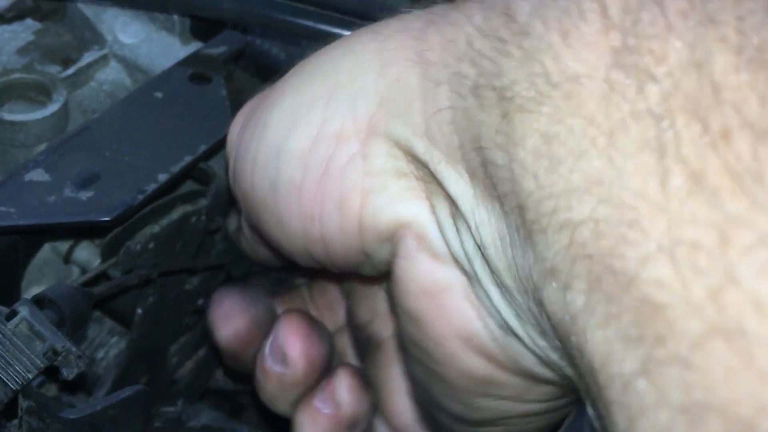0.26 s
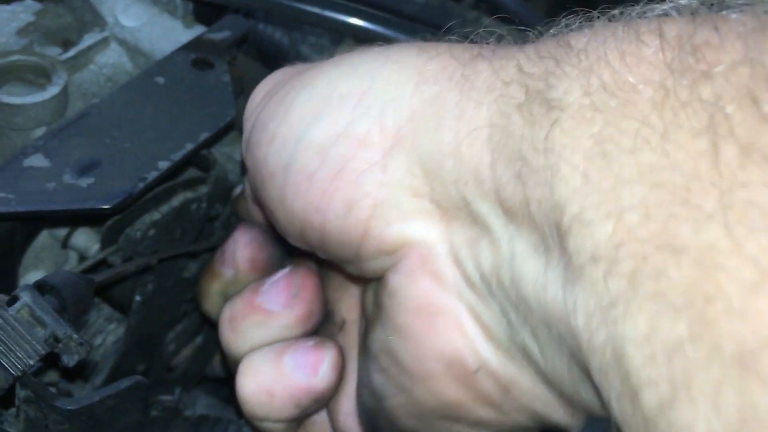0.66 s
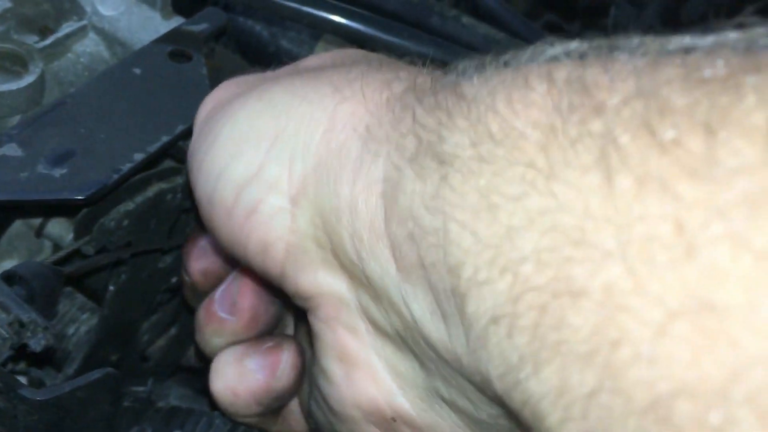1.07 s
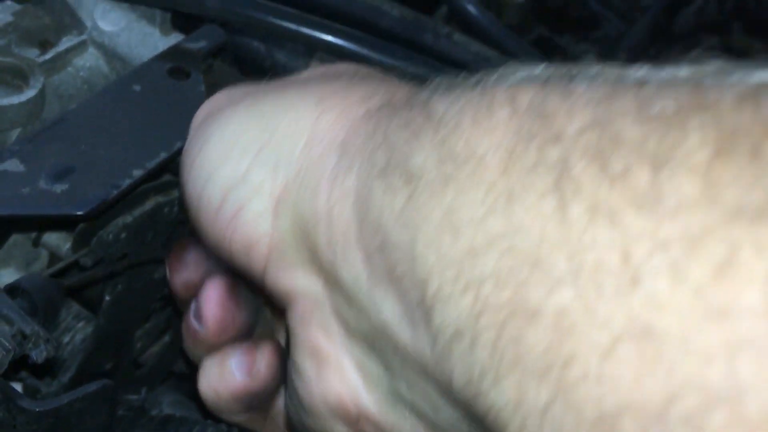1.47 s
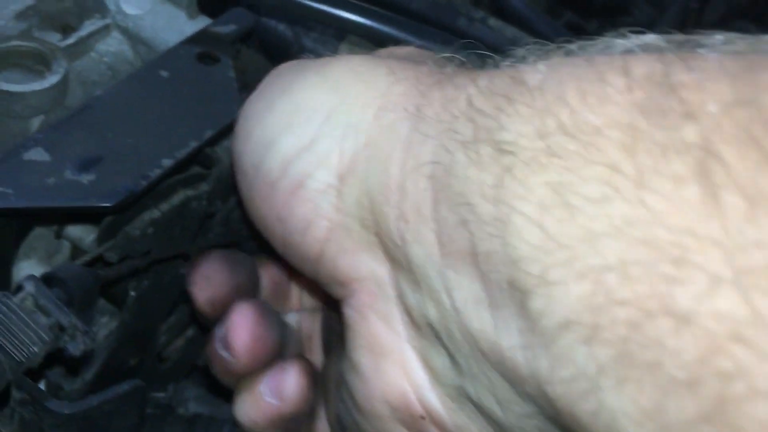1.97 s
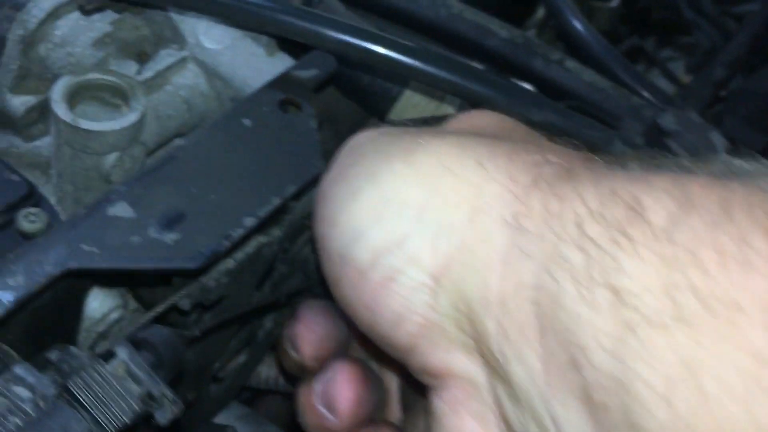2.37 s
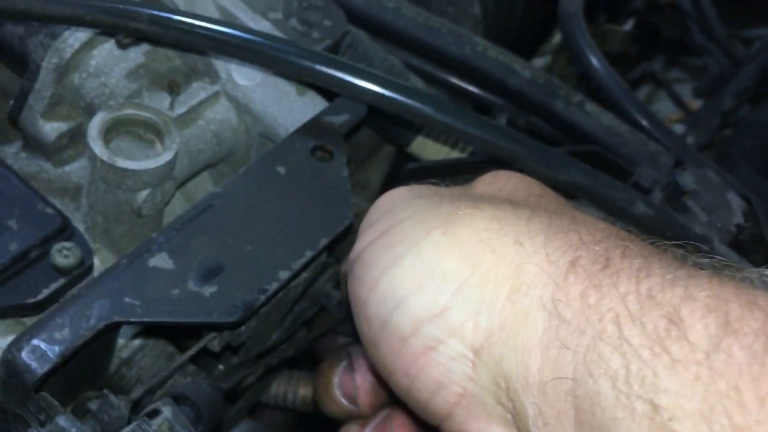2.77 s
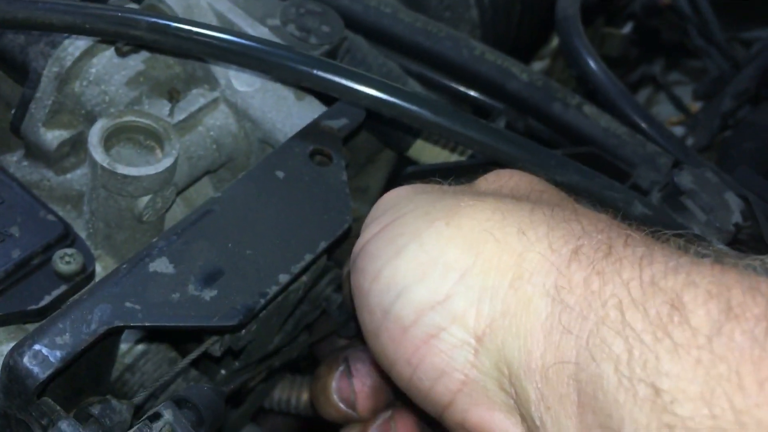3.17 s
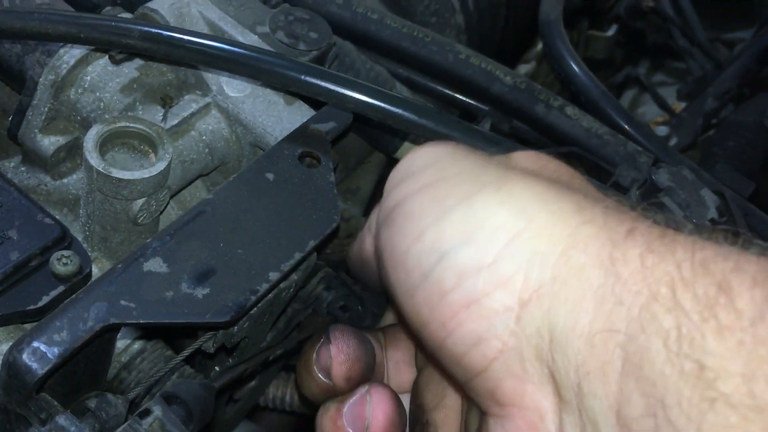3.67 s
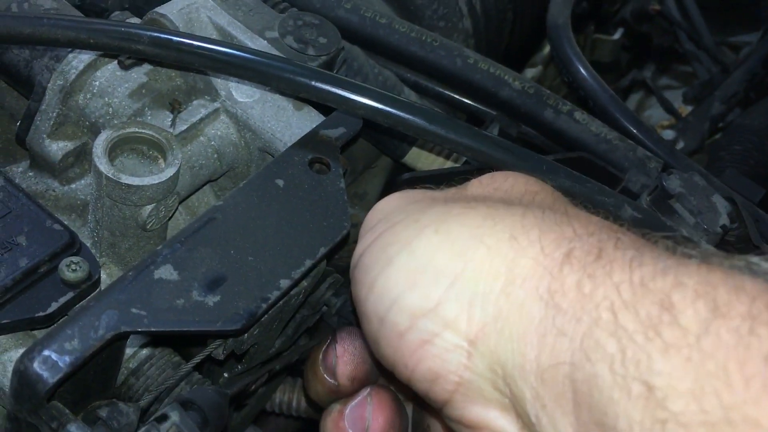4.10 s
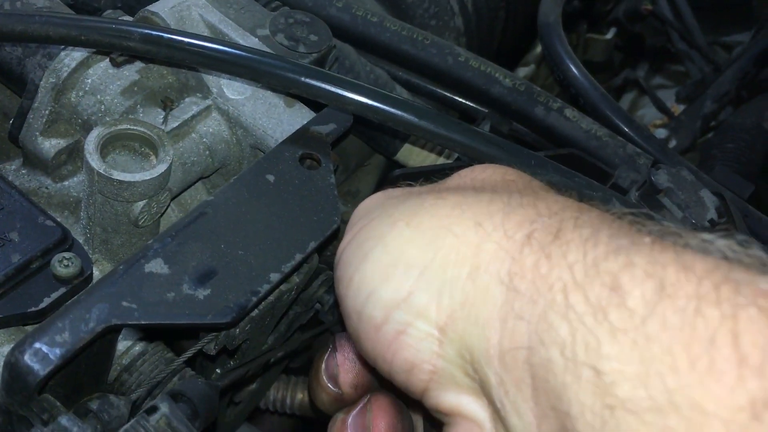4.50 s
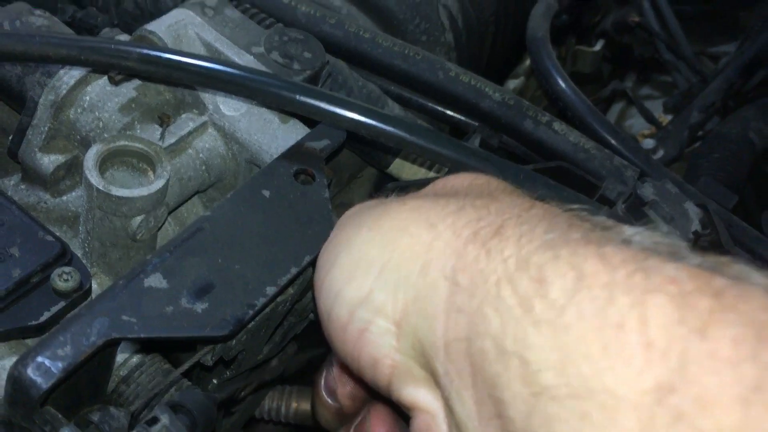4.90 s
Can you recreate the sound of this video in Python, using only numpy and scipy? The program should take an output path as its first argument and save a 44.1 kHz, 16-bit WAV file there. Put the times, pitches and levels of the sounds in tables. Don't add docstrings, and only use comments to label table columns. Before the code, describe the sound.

Fingers tick and scuff on hollow plastic in a quiet garage, then one loud bright snap cracks, followed by sparse faint handling ticks.

```python
import sys
import numpy as np
from scipy import signal
from scipy.fft import rfft, irfft
from scipy.io import wavfile

SR = 44100
rng = np.random.default_rng(int(sys.argv[2]) if len(sys.argv) > 2 else 0)


def master(y):
    cut = np.clip(np.atleast_2d(y).T, -1, 1)
    pcm = np.round(cut * 32767)
    wavfile.write(sys.argv[1], SR, pcm.astype(np.int16))


def convert_level_to_amplitude(level_db):
    exponent = np.asarray(level_db, float) / 20
    return 10 ** exponent


N = 226933
STEADY_HZ = 15800


def evened(x):
    return x / np.sqrt(np.mean(x ** 2) + 1e-20)


def read(points, hz):
    f, value = np.transpose(points)
    return np.interp(np.log(hz + 1), np.log(f + 1), value)


def automation(points):
    return np.interp(np.arange(N) / SR, *np.transpose(points))


def add(mix, s, sound):
    part = mix[round(s * SR):][:len(sound)]
    part += sound[:len(part)]


def coloured(x, spectrum):
    gain = convert_level_to_amplitude(read(spectrum, np.fft.rfftfreq(len(x), 1 / SR)))
    return evened(irfft(rfft(x) * gain, len(x)))


def below(x, hz):
    taps = signal.firwin(511, hz, window=("kaiser", 9), fs=SR)
    return signal.oaconvolve(x, taps, "same")


def resonate(x, hz, width):
    r = np.exp(-np.pi * width / SR)
    pole = r * np.exp(2j * np.pi * hz / SR)
    return 2 * signal.lfilter([1 - r], [1, -pole], x).real


def narrow_band(drive, hz, width):
    return evened(resonate(resonate(drive, hz, width), hz, width))


def ring(hz, t60, s=.25):
    t = np.arange(round(s * SR)) / SR
    return convert_level_to_amplitude(-60 * t / max(t60, .002)) * np.sin(2 * np.pi * hz * t)


def eased_in(tone, rise_s):
    return tone * np.minimum(np.arange(len(tone)) / (rise_s * SR), 1)


def chord(modes, spread_db):
    out = 0
    for hz, db, t60 in modes:
        level = convert_level_to_amplitude(db + spread_db * rng.standard_normal())
        out = out + level * ring(hz * rng.normal(1, 0.0072), t60)
    return out


def gritty(size, grit_db):
    grains = np.repeat(rng.exponential(1, size // 32 + 1), 32)[:size]
    return evened(rng.standard_normal(size) * convert_level_to_amplitude(grit_db * np.minimum(grains, 4)))


# f/Hz, level/dB per Hz
HISS = [(88, -31), (150, -10), (430, -15), (502, -13.5), (741, -19.5), (1010, -19), (1360, -24),
        (2340, -24.5), (4910, -27.5), (8980, -29.5), (15800, -34.5)]
# t/s, level/dB
OPEN = [
    (1.758, 2),
    (1.765, 8.5),
    (2.167, 12.5),
    (2.18, 0.5),
]


def hiss():
    noise = coloured(rng.standard_normal(N), [(60, -39.0)] + HISS)
    return convert_level_to_amplitude(-72.5 + automation(OPEN)) * noise


# f/Hz, level/dB per Hz
HUM = [(12, -61), (20, -34), (30, -20), (51, 1), (70, 4), (116, -1), (125, -5.5), (134, -17.5), (150, -8),
       (168, -16), (221, -15.5), (265, -23), (300, -21), (390, -55), (660, -120)]
# t/s, level/dB
HUM_SWELL = [(0.0, -56), (0.31, -60.5), (0.7, -58), (1.6, -60.5), (2.55, -59.5), (2.94, -58),
             (4.669, -57.5), (5.15, -59)]


def hum():
    motor_hz, motor_width_hz, motor_db = 107, 4.2, -7
    motor = resonate(rng.standard_normal(N), motor_hz, motor_width_hz)
    rumble = coloured(rng.standard_normal(N), HUM)
    return convert_level_to_amplitude(automation(HUM_SWELL)) * (rumble + convert_level_to_amplitude(motor_db) * coloured(motor, HUM))


# f/Hz, t60/s
GARAGE = [(200, 0.94), (600, 0.2996), (2000, 0.51), (5000, 0.48), (9000, 0.45), (15000, 0.28)]


def garage(x):
    hz, t, z = signal.stft(rng.standard_normal(SR), SR, nperseg=256)
    tail = signal.istft(z * convert_level_to_amplitude(-60 * t / read(GARAGE, hz)[:, None]), SR, nperseg=256)[1]
    tail *= np.clip((np.arange(len(tail)) / SR - .004) / 0.0024, 0, 1)
    return signal.fftconvolve(x, tail / np.linalg.norm(tail))[:N]


# f/Hz, width/Hz, level/dB
HOUSING = [(620, 44, -5), (1191, 330, -7.5), (1660, 60, -4), (1860, 14, 0), (2230, 140, -8.5)]
# f/Hz, level/dB per Hz
BODY = [(300, -23), (600, 4.5), (1200, 1), (2400, -4.5), (3500, -12), (6000, -38)]


def rubbed_body(drive, housing_share):
    housing = sum(convert_level_to_amplitude(db) * resonate(drive, hz, width) for hz, width, db in HOUSING)
    return evened(coloured(drive, BODY) + housing_share * evened(housing))


# f/Hz, level/dB per Hz
RUSTLE = [(100, -26.5), (170, 2.5), (350, 3), (600, -35.5)]
FIZZ = [(1500, -27), (3200, -3), (6000, 5), (9500, -0.5), (13000, -3), (15600, -12), (16100, -59.5)]
# t/s, level/dB
SLIDE = [(0.0, 10), (0.1, 1), (0.27, -8), (0.64, 6), (0.8, 7.5), (1.07, 0.5), (1.3, 8), (1.5, -11),
         (1.75, 8.5), (2.0, 5.5), (2.2, -8), (2.49, 6.5), (2.65, 1.5), (3.15, -12), (4.08, -6), (4.6, -12),
         (4.9, -3), (5.15, 2.5)]
# level/dB at middle effort, rise/dB per dB of effort
SLIDE_LAYERS = [
    (-65.5, 0.93),
    (-64.5, 0.89),
    (-79.5, 1.2),
]


def slide():
    drive = gritty(size=N, grit_db=1.0)
    effort_db = automation(SLIDE)
    layers = coloured(drive, RUSTLE), rubbed_body(drive, 0.18), coloured(drive, FIZZ)
    out = np.zeros(N)
    for (db, share), layer in zip(SLIDE_LAYERS, layers):
        out += convert_level_to_amplitude(db + share * effort_db - 10.5) * layer
    return out


# t/s, length/s, level/dB, f/Hz, width/Hz
DRAGS = [(.02, 0.1, -64, 610, 200), (0.808, 0.71, -68, 317.6, 59.4), (3.785, 0.082, -81, 674, 180),
         (4.97, 0.065, -68.5, 670, 120.4), (3.785, 0.085, -82, 1830, 120), (4.01, 0.16, -79, 1830, 400),
         (2.3, .38, -72, 1020, 600), (2.38, .1, -79, 1830, 250), (2.5, .1, -83, 3100, 130),
         (2.5, .15, -82, 2130, 250), (.89, .16, -69, 1050, 400), (.9, .12, -76, 2420, 150),
         (1.115, .1, -75, 2150, 400), (1.115, .12, -71, 1200, 600), (1.24, .08, -72, 1000, 500),
         (3.58, .08, -79, 1750, 150), (1.41, .04, -73, 1900, 150)]


def drags():
    out = np.zeros(N)
    for s, length, db, hz, width in DRAGS:
        band = narrow_band(gritty(size=32768, grit_db=2.5), hz, width)
        count = round(length * SR)
        add(out, s, convert_level_to_amplitude(db) * band[:count] * signal.windows.tukey(count, .7))
    return out


# t/s, length/s, level/dB, f/Hz, width/Hz
SINGING = [(.04, .045, -62, 8450, 250), (.045, .035, -64, 9500, 300), (.022, .02, -67, 6500, 500),
           (.075, .026, -62, 2500, 900), (.1, .025, -70, 12800, 500), (.115, .02, -70, 7000, 600),
           (.34, .05, -67, 8500, 400), (.35, .035, -70, 9900, 300), (.828, .016, -62, 5600, 300),
           (.824, .016, -65, 7400, 350), (.825, .02, -66, 9500, 400), (.826, .03, -67, 10800, 300),
           (.826, .012, -63, 3300, 400), (.838, .025, -66, 3900, 250), (.84, .022, -67, 5500, 350),
           (.855, .018, -66, 1800, 200), (3.79, .08, -73, 1850, 25), (4.06, .04, -73, 1830, 60),
           (4.03, .1, -77, 1660, 60), (4.11, .05, -77, 1830, 60), (3.921, .012, -66, 2350, 200),
           (3.778, .014, -68, 2500, 200), (2.265, .035, -72, 1100, 150), (2.31, .05, -74, 1350, 200),
           (2.31, .07, -74, 930, 150), (2.53, .03, -72, 1050, 300), (2.585, .1, -73, 1150, 200),
           (2.55, .07, -81, 3500, 200), (2.41, .03, -75, 2100, 200), (2.52, .135, -77, 3080, 50),
           (2.255, .03, -75, 2050, 300), (2.45, .05, -76, 1800, 120), (4.76, .05, -77, 1800, 60),
           (5.04, .04, -75, 1840, 100), (.79, .04, -62, 150, 40), (1.41, .05, -64, 140, 40),
           (1.77, .022, -40, 8600, 700), (5.0, .07, -73, 3570, 80), (5.055, .04, -73, 3280, 150),
           (4.968, .02, -70, 1730, 200)]


def singing():
    out = np.zeros(N)
    for s, length, db, hz, width in SINGING:
        band = narrow_band(gritty(size=8192, grit_db=3.0), hz, width)
        settled = band[2048:]
        count = round(length * SR)
        add(out, s, convert_level_to_amplitude(db) * settled[:count] * signal.windows.tukey(count, .6))
    return out


def stroke_shape(count):
    u = np.linspace(0, 1, count)
    return np.sqrt(np.clip(u / 0.14, 0, 1) * np.clip((1 - u) / .5, 0, 1))


# t/s, length/s, level/dB, fizz against body/dB
SCUFFS = [(.0, .13, -67.5, 1.5), (.022, 0.062, -65.5, -17), (0.085, 0.01, -58, -10),
          (0.144, .022, -66, -28), (0.183, 0.031, -69.5, -5), (0.278, 0.032, -70.5, -3),
          (0.313, 0.038, -60, -6), (0.345, 0.042, -73, 0), (0.421, 0.061, -69.5, -12),
          (0.664, 0.016, -63, -14), (0.683, 0.037, -57.5, -4), (0.82, 0.043, -63, 2),
          (0.879, 0.17, -63, -10.5), (1.233, 0.067, -67.5, -17), (1.391, 0.092, -67, -8),
          (1.669, 0.15, -68, -5), (1.713, .014, -70, 5), (1.807, 0.054, -61, -15), (2.562, 0.11, -77, 2),
          (2.9, 0.19, -74, -18), (3.392, 0.012, -61, -7), (3.406, 0.085, -77, -8), (3.776, 0.018, -66, 6),
          (3.897, 0.042, -74, 2.5), (4.018, 0.13, -73, -2.5), (4.749, 0.17, -73, -1),
          (4.961, .15, -68.5, -3.5), (5.107, 0.038, -75.5, 4.5)]


def scuffs():
    out = np.zeros(N)
    for s, length, db, fizz_db in SCUFFS:
        drive = gritty(size=8192, grit_db=2.5)
        stroke = convert_level_to_amplitude(db) * (rubbed_body(drive, 0.13) + convert_level_to_amplitude(fizz_db) * coloured(drive, FIZZ))
        count = min(round(length * SR), len(drive))
        add(out, s, stroke[:count] * stroke_shape(count))
    return out


# t/s, length/s, level/dB, f/Hz
SQUEAKS = [(0.02, 0.0089, -61.5, 2180), (.045, 0.04, -60, 8430), (0.072, 0.025, -61.5, 2760),
           (0.142, 0.013, -59, 2300), (0.017, .11, -67, 10000), (.312, 0.037, -68.5, 10000),
           (0.347, 0.043, -71, 9100), (.66, 0.024, -72, 5950), (.69, .03, -66, 10600),
           (.826, 0.036, -68, 3550), (.836, 0.024, -55.5, 1770), (1.42, 0.03, -70, 3506),
           (1.67, .071, -70.5, 1000), (1.81, 0.064, -80, 1440), (3.394, 0.012, -65, 2300),
           (3.895, 0.05, -70, 1810), (4.75, 0.11, -80, 1800), (4.973, 0.15, -78, 3600),
           (5.10, 0.056, -77.5, 1245)]


def squeaks():
    out = np.zeros(N)
    for s, length, db, hz in SQUEAKS:
        drive = gritty(size=8192, grit_db=1.0)
        squeak = convert_level_to_amplitude(db) * narrow_band(drive, hz, 0.14 * hz)
        count = min(round(length * SR), len(drive))
        add(out, s, squeak[:count] * stroke_shape(count))
    return out


# t/s, peak level/dB, f/Hz, t60/s
KNOCKS = [(0.048, -58.5, 200.4, 0.24), (0.092, -47, 103.5, 0.35), (0.339, -57, 106, 0.12),
          (0.41, -59, 168, 0.12), (0.466, -51.5, 179, 0.062), (0.483, -51.5, 155, 0.12),
          (0.589, -53.5, 101, 0.067), (0.67, -47.5, 184, 0.084), (0.715, -44, 202, 0.04),
          (0.902, -54, 170, 0.075), (1.125, -53, 162, 0.095), (1.297, -57, 169, 0.12),
          (1.758, -44, 104, 0.1), (1.817, -53, 318, 0.038), (1.826, -36, 109, 0.025),
          (2.799, -53, 100.7, 0.1), (3.396, -55.5, 211.6, 0.11), (3.454, -47.5, 174.5, 0.079),
          (3.785, -55, 215, 0.04), (4.026, -53.5, 101.5, 0.067), (4.863, -52, 175, 0.08),
          (5.12, -57.5, 111.4, 0.14), (5.124, -52, 208, 0.17)]


def knocks():
    out = np.zeros(N)
    for s, db, hz, t60 in KNOCKS:
        low = ring(hz, t60) + 0.35 * ring(1.8 * hz, 0.69 * t60)
        add(out, s, convert_level_to_amplitude(db + 5.5) * eased_in(low, 0.0024))
    return out


# t/s, level/dB, f/Hz, t60/s
PINGS = [(.024, -54, 1590, .02), (.032, -54, 1870, .03), (.036, -53, 610, .06), (.054, -54, 1810, .03),
         (.064, -54, 1660, .03), (.077, -50, 1860, 0.03), (.092, -52, 1810, 0.03), (.1, -55, 620, 0.087),
         (0.148, -52, 1642, .05), (.148, -56.5, 620, 0.14), (.663, -44, 1120, .025),
         (.689, -43, 1520, .015), (1.815, -46, 1340, 0.043), (1.816, -41, 2070, .02),
         (1.82, -43, 1845, 0.045), (1.825, -50, 635, .06), (1.836, -52, 640, 0.04),
         (.325, -56, 1860, 0.097), (.322, -50, 2100, .015), (3.785, -60, 1660, 0.04),
         (4.39, -63, 1801, .03), (3.395, -54, 2300, 0.016), (3.396, -57, 4030, .03),
         (3.396, -57.5, 3140, .015), (3.399, -54.5, 1838, .05), (3.399, -52, 1650, .05),
         (3.404, -47.5, 608, 0.065), (1.7645, -25, 4170, .022), (1.7645, -31, 2700, .03),
         (1.783, -46, 3270, .05), (1.79, -49, 2760, .045), (1.7205, -46, 1370, .07),
         (1.7235, -46, 1860, .07), (1.724, -48, 3150, .02), (.838, -52, 1860, .06), (.843, -53, 1660, .05),
         (.848, -52, 1860, .05), (.5965, -46, 4300, .008), (.5645, -54, 9500, .01), (.704, -52, 10600, .02),
         (.144, -52, 3000, .015), (.085, -52, 3100, .02), (1.265, -60, 2430, .04), (1.425, -60, 1880, .04),
         (.92, -60, 2420, .04), (1.118, -60, 2400, .012), (5.121, -50, 1170, .06), (5.123, -52, 790, .07),
         (.319, -50, 4050, .015), (.33, -57, 1860, .07)]


def pings():
    out = np.zeros(N)
    for s, db, hz, t60 in PINGS:
        add(out, s, convert_level_to_amplitude(db) * eased_in(ring(hz, t60), 0.0014))
    return out


# t/s, peak level/dB, f/Hz, t60/s
PRICKS = [(0.417, -48, 4530, 0.0071), (0.427, -53, 8100, 0.012), (0.558, -64, 4420, 0.012),
          (0.5995, -43.5, 6600, 0.01), (0.635, -53, 8800, 0.01), (0.669, -44, 6000, 0.005),
          (1.133, -48.5, 8800, 0.03), (1.3868, -45, 4750, 0.0049), (1.658, -57, 12500, 0.027),
          (2.2694, -52, 5490, 0.013), (2.862, -53.5, 6520, 0.012), (3.7781, -44, 6320, 0.019),
          (3.9056, -49.5, 5950, 0.012), (5.0665, -51, 5600, 0.03)]
LEAD_PRICKS = [
    (1.7226, -34.5, 6000, 0.021),
    (1.723, -38, 11000, 0.011),
    (1.7372, -41.5, 10000, .015),
    (1.7483, -45.5, 9400, .015),
    (1.818, -50, 6100, .03),
]


def pricks():
    t, out = np.arange(1024) / SR, np.zeros(N)
    for s, db, hz, t60 in PRICKS + LEAD_PRICKS:
        noise = rng.standard_normal(len(t))
        prick = 0.16 * coloured(noise, FIZZ) + .5 * evened(resonate(noise, hz, 2520))
        add(out, s, convert_level_to_amplitude(db - 1.5 - 60 * t / max(t60, .006)) * eased_in(prick, 0.00077))
    return out


# f/Hz, level/dB per Hz
KNUCKLE = [(300, -17), (700, -3.5), (1500, 4.5), (3000, -6.5), (4500, -11.5), (7000, -28.5)]
EDGE = [(1200, -22.5), (2200, 0), (4300, -2.5), (7000, -13.5), (15600, -19.5), (16100, -58.5)]
# f/Hz, level/dB, t60/s
LOW_RING = [(610, 1, 0.05), (695.6, -2.5, .05), (811.5, -11.5, .03)]
HIGH_RING = [(1660, 0, 0.04024), (1860, -4, 0.056), (2300, -3, 0.04), (3080, -8.5, .02),
             (3308, -14.5, 0.021), (4030, -11, 0.022)]


def struck(s, db, hz, edge_db, hollow_db, walls_db):
    t, out = np.arange(1024) / SR, np.zeros(N)
    noise = rng.standard_normal((3, len(t)))
    contact_s = 0.0014
    swell = t / contact_s * np.exp(1 - t / contact_s)
    tap = swell * np.sin(2 * np.pi * hz * t)
    tap += 0.67 * eased_in(coloured(noise[0], KNUCKLE) * convert_level_to_amplitude(-60 * t / 0.015), 0.00059)
    puff = convert_level_to_amplitude(edge_db) * eased_in(coloured(noise[1], EDGE) * convert_level_to_amplitude(-60 * t / 0.017), 0.00066)
    add(out, s, convert_level_to_amplitude(db) * (tap + puff))
    scrape = noise[2] * convert_level_to_amplitude(-60 * t / 0.025)
    body = convert_level_to_amplitude(hollow_db) * chord(LOW_RING, 1.4) + convert_level_to_amplitude(walls_db) * chord(HIGH_RING, 1.7)
    add(out, s, convert_level_to_amplitude(db) * signal.fftconvolve(body, scrape / np.linalg.norm(scrape)))
    return out


# t/s, peak level/dB, f/Hz, bright edge/dB
TAPS = [(0.507, -60, 1280, -4), (0.516, -46.5, 1126, -21), (0.558, -51, 2800, 1), (0.5645, -55, 1390, 2),
        (0.577, -60, 2030, -7), (0.597, -42.5, 1920, -20), (0.6, -41.5, 1150, -14),
        (0.6205, -43.5, 1200, -12), (0.625, -47, 1060, -17), (0.6415, -48, 1090, -30),
        (0.662, -56, 1150, -23), (0.67, -46.5, 1130, -25), (0.686, -51, 2030, -28), (0.693, -42, 1045, -10),
        (0.829, -53, 1820, -2), (0.826, -62, 1200, 2), (0.838, -56, 3600, 3), (0.848, -56, 1800, 2),
        (0.858, -60, 1100, 2)]


def cable_taps():
    return sum(struck(*row, hollow_db=-16, walls_db=-20) for row in TAPS)


# t/s, peak level/dB, f/Hz, bright edge/dB
LEAD_TICKS = [(0.085, -48.5, 1660, -10), (0.091, -49.5, 1820, -15), (0.144, -49, 2210, -18),
              (1.7186, -52, 1550, 2), (1.7237, -40.5, 1410, -0.5), (1.7300, -48, 1420, -30),
              (1.7370, -51, 1630, -30), (2.262, -67, 2070, -5), (3.395, -53.5, 1810, -14.5),
              (3.525, -64, 1390, -7.5), (3.911, -54, 1810, -16.5), (3.925, -54.5, 1730, -19.5),
              (4.02, -62, 1794, -6.5)]


def wall_ticks():
    return sum(struck(*row, hollow_db=-19.5, walls_db=-6.5) for row in LEAD_TICKS)


# t/s, peak level/dB, f/Hz, bright edge/dB, ring/dB
TICKS = [(0.319, -50, 1820, 4, -12), (0.361, -61, 2500, 0, -6), (1.119, -62, 926, -30, -17),
         (1.399, -63.5, 820, -1, -10), (1.817, -48, 450, -13, -9), (1.8255, -46.5, 674, -30, -8.5),
         (2.859, -65, 2300, -9, -20), (3.398, -49.5, 620, -20, -10), (3.443, -63, 1160, -17.5, -2.5),
         (3.781, -55, 1650, -14, -17), (5.118, -51, 2250, -4, -8)]


def hollow_ticks():
    return sum(struck(*row, walls_db=row[-1] - 1.5) for row in TICKS)


# f/Hz, level/dB per Hz
RADIATED = [(100, -30), (600, -26.5), (1900, -15.5), (4500, -15.5), (6300, -11), (7600, -11.5), (9200, -4),
            (11000, -9), (15500, -15)]


def radiated():
    pulse, out = np.zeros(512), np.zeros(N)
    pulse[64] = 1
    click = coloured(pulse, RADIATED)
    add(out, SNAP_S[0], convert_level_to_amplitude(-10) * click / abs(click).max())
    return out


SNAP_S = [
    1.7610,
    1.7616,
    1.7620,
    1.7635,
    1.7654,
]
SNAP_DB = [-0.5, -1, -1.5, -9, -10.5]
# f/Hz, level/dB per Hz
CRACK = [(60, -15), (200, -17.5), (400, -32), (1000, -32), (1840, -14), (2750, -12.5), (4200, -11.5),
         (5200, -16.5), (7100, -2), (7500, -22), (8000, -22), (8500, -3), (9200, 0), (13700, -6),
         (16000, -15.5), (16800, -29)]
# f/Hz, level/dB, t60/s
SNAP_MODES = [(85.23, -38, 0.075), (330, -41, .015), (625, -41, .09), (720, -35, .03), (1060, -42.5, 0.018),
              (1670, -31, 0.054), (1862, -28, .095), (2150, -39, .04), (2390, -38, .03), (2730, -33, .04),
              (3150, -38, .06), (3290, -35, 0.05), (3998, -33.5, 0.03), (4150, -32, .035)]
LATCH_MODES = [(6165, -23, 0.04), (7128, -17.5, 0.025), (8480, -22, 0.025), (8772, -20, .035),
               (9055, -22, .025), (9390, -21, .028), (9820, -26, .02), (10063, -22, 0.025),
               (10920, -23, .025), (11420, -26, .025), (11810, -24, .02), (12260, -25, .018),
               (13290, -22, .02), (13950, -21, .015)]


def snap():
    t, out = np.arange(8192) / SR, np.zeros(N)
    length = len(t) / SR
    crack_db, crack_t60 = -17, 0.024
    for s, db in zip(SNAP_S, SNAP_DB):
        burst = below(coloured(rng.standard_normal(len(t)), CRACK), STEADY_HZ)
        burst = burst * convert_level_to_amplitude(crack_db - 60 * t / crack_t60)
        edge = 0.7 * ring(9000, 0.0026, length)
        edge += 0.18 * ring(12800, .002, length)
        edge += 0.1 * ring(16200, .0012, length)
        add(out, s, convert_level_to_amplitude(db) * (burst + edge))
    for s, modes in zip(SNAP_S, (SNAP_MODES, LATCH_MODES)):
        add(out, s, convert_level_to_amplitude(0.5) * sum(convert_level_to_amplitude(db) * ring(hz, t60) for hz, db, t60 in modes))
    shudder_db, shudder_t60 = -27, 0.09
    shudder = below(coloured(gritty(size=len(t), grit_db=1.2), CRACK), STEADY_HZ)
    add(out, SNAP_S[0], convert_level_to_amplitude(shudder_db - 60 * t / shudder_t60) * shudder)
    return out


# t/s, level/dB
DUCK = [
    (1.7525, 0),
    (1.7535, -15),
    (1.7562, -15),
    (1.757, 0),
]


def limiter_dip(x):
    return x * convert_level_to_amplitude(automation(DUCK))


def scene():
    touches = hollow_ticks() + wall_ticks() + cable_taps() + pricks() + pings() + knocks()
    hand = touches + scuffs() + squeaks() + drags() + slide()
    room = garage(convert_level_to_amplitude(-17.5) * hand + radiated())
    rest = hand + room + hum() + singing()
    return (snap() + below(rest, STEADY_HZ))[None]


def roll_off(x):
    return signal.sosfilt(signal.butter(12, 17320, fs=SR, output="sos"), x)


def record(dry):
    ceiling, top_hz, bottom_hz = .86, 16750, 38
    heard = below(np.clip(dry[0], -ceiling, ceiling), top_hz) + below(hiss(), STEADY_HZ)
    heard = limiter_dip(heard)
    heard = signal.sosfilt(signal.butter(2, bottom_hz, "high", fs=SR, output="sos"), heard)
    return roll_off(heard[None])


dry = scene()
out = record(dry)
master(out)
```